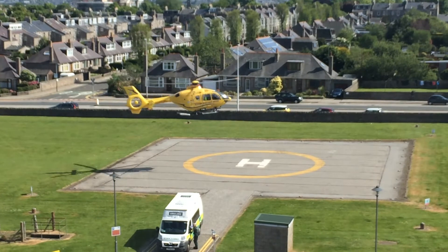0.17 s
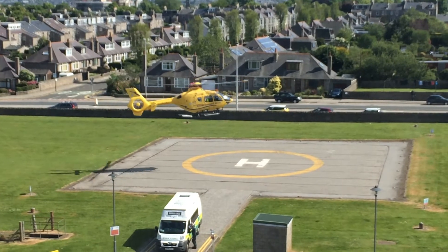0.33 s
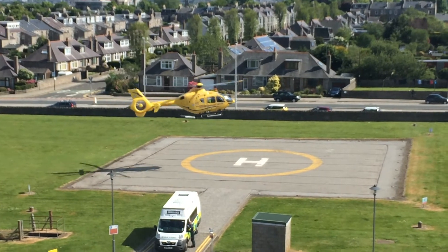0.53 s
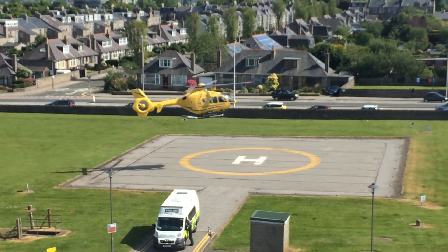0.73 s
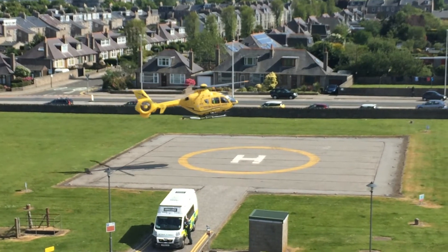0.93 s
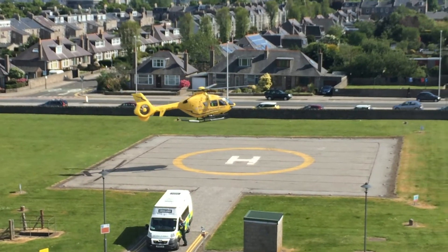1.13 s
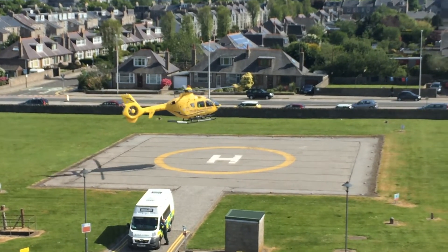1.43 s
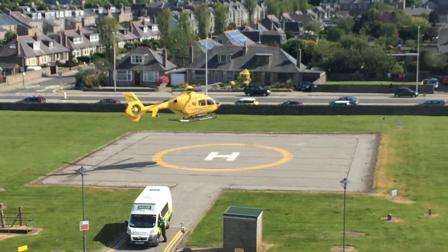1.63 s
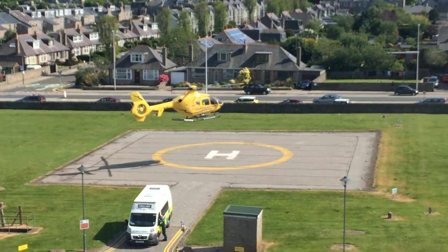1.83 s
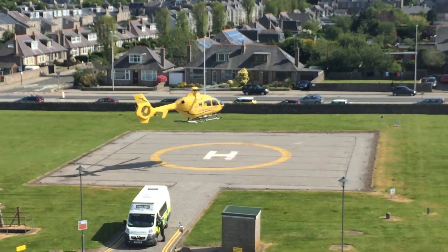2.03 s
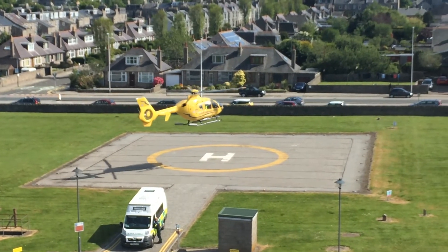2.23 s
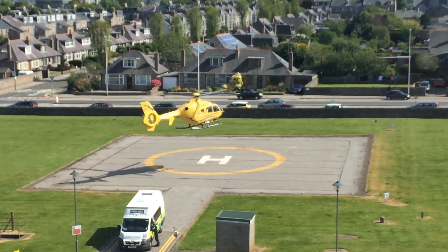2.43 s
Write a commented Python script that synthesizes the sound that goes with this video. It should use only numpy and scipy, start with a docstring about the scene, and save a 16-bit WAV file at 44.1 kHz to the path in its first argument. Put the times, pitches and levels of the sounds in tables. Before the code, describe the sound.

Steady low drone of a distant hovering helicopter, with swishing blades and a fuzzy whine.

```python
"""Over open grass and houses, a light helicopter hovers some way off.
Its main rotor drones on harmonics of the blade-passing rate; three stand out and fade in turn.
Each blade sheds a swish of turbulent air, and the fuzzy whines of the shrouded tail fan pulse in the
rotor's wake. The turbines hiss, with faint tones and, near the end, two thin whistles.
Beneath it all lie the low rumble of the downwash and a faint steady hiss."""
import sys
import numpy as np
from scipy import signal
from scipy.fft import rfft, irfft, next_fast_len
from scipy.io import wavfile
from scipy.ndimage import uniform_filter1d

SR = 44100
rng = np.random.default_rng(int(sys.argv[2]) if len(sys.argv) > 2 else 0)


def transcribe(signal):
    """Save signal, clipped to [-1, 1], as a 16-bit WAV file at the path in sys.argv[1]."""
    frames = np.atleast_2d(signal).T
    limited = np.clip(frames, -1, 1)
    pcm = np.round(limited * 32767).astype(np.int16)
    wavfile.write(sys.argv[1], SR, pcm)


N = 113778
T = np.arange(N) / SR

# The loud drone near harmonic 7. Each row: time in seconds, pitch in Hz, relative level in dB.
DRONE_TRACK = [(0.0, 192, -31.5), (0.03, 190.4, -28.5), (0.07, 189.8, -29), (0.16, 191.3, -42.5),
               (0.19, 187.8, -40), (0.22, 190, -33.5), (0.37, 191, -29.5), (0.48, 194.1, -33.5),
               (0.57, 191.7, -35.5), (0.61, 193, -27.5), (0.75, 192.8, -31), (0.84, 188.7, -30.5),
               (0.9, 188.9, -41.5), (0.95, 189.1, -34), (1.06, 190.4, -37.5), (1.11, 191, -49),
               (1.14, 190, -40.5), (1.21, 190.5, -35), (1.29, 192.1, -37.5), (1.34, 191.9, -33),
               (1.74, 192.1, -32.5), (1.81, 192.0, -39.5), (1.87, 191, -33.5), (2.03, 192.0, -42),
               (2.08, 191.7, -35), (2.12, 191.8, -36), (2.16, 190.5, -42.5), (2.28, 191.5, -36),
               (2.34, 192.4, -40), (2.38, 193.9, -55), (2.42, 193.1, -40.5), (2.5, 193.1, -45),
               (2.58, 190, -47.5)]
# The throb (harmonic 2) and the hum (harmonic 10). Each row: time in seconds, relative level in dB.
THROB_LEVEL = [(0.0, -55), (0.1, -53.5), (0.3, -56.5), (0.42, -60.5), (0.6, -55), (0.84, -46.5),
               (0.95, -52), (1.2, -53.5), (1.3, -49.5), (1.4, -56.5), (1.7, -49), (2.08, -50), (2.33, -47),
               (2.45, -48.5), (2.58, -47.5)]
HUM_LEVEL = [(0.0, -51.5), (0.08, -48.5), (0.2, -42.5), (0.4, -46.5), (0.52, -56), (0.7, -61), (0.95, -55),
             (1.08, -46.5), (1.25, -48.5), (1.5, -42), (1.78, -47), (1.92, -58), (2.05, -61), (2.22, -54.5),
             (2.4, -75), (2.58, -63)]
# The weaker harmonics in three groups. Each row: harmonic number, level in dB relative to its group.
LOW_HARMONICS = [(3, -13.5), (4, -12.5), (5, -6.5), (6, -7.5), (8, -7)]
CHOP_HARMONICS = [(9, -15), (11, -5), (12, -7), (13, -7), (14, -8.5), (15, -13), (16, -16), (17, -19.5)]
BUZZ_HARMONICS = [(18, -3.5), (19, -7.5), (20, -4.5), (21, -16.5), (22, -20.5), (23, -21), (27, -16.5)]
# The groups' levels; the downwash shares the low one. Each row: time in seconds, relative level in dB.
LOW_LEVEL = [(0.0, -46.5), (0.35, -46), (0.55, -44.5), (0.75, -47), (1.0, -47.5), (1.3, -49), (1.55, -46),
             (1.85, -49), (2.15, -48.5), (2.35, -50), (2.58, -49.5)]
CHOP_LEVEL = [(0.0, -51), (0.2, -50.0), (0.45, -51.5), (0.62, -48.5), (0.78, -53.5), (0.95, -49.5),
              (1.15, -49), (1.33, -44.5), (1.55, -50), (1.75, -54.5), (2.0, -60.5), (2.3, -58),
              (2.58, -56.5)]
BUZZ_LEVEL = [(0.0, -52), (0.2, -59), (0.45, -53.5), (0.65, -52.5), (0.8, -54), (1.0, -53.5), (1.17, -49.5),
              (1.3, -56.5), (1.5, -49), (1.75, -63.5), (2.1, -66), (2.4, -67), (2.58, -57.5)]


def main_rotor(passes):
    """Periodic excitation: regular blade passes radiate a harmonic series, led by three partials."""
    drone_cycles = np.cumsum(curve(DRONE_TRACK)) / SR
    drone = amp(curve(DRONE_TRACK, column=2) - 0.5) * np.cos(2 * np.pi * drone_cycles)
    throb = amp(curve(THROB_LEVEL)) * np.cos(2 * np.pi * 2 * passes)
    hum = amp(curve(HUM_LEVEL) + 1) * np.cos(2 * np.pi * 10 * passes)
    low = fading_harmonics(passes, LOW_HARMONICS, LOW_LEVEL)
    chop = fading_harmonics(passes, CHOP_HARMONICS, CHOP_LEVEL)
    buzz = fading_harmonics(passes, BUZZ_HARMONICS, BUZZ_LEVEL)
    return np.sqrt(2) * (drone + throb + hum + low + chop + buzz)


def fading_harmonics(passes, harmonics, level, depth=0.49, fading_hz=9):
    """Scintillation: turbulent air stirs the amplitude and phase of each harmonic separately."""
    group = np.zeros(N)
    for number, db in harmonics:
        air = unit(1 + depth * (drift(fading_hz) + 1j * drift(fading_hz)))
        cycles = number * passes + 0.25 * rng.standard_normal()  # scattered starting phase
        group += amp(db) * (air * np.exp(2j * np.pi * cycles)).real
    return amp(curve(level)) * group


# The colour of the swish. Each row: frequency in Hz, relative spectral density in dB.
SWISH_SPECTRUM = [(150, -10.5), (280, -2), (400, -0.5), (530, 1.5), (620, -2), (710, -8.5), (810, -0.5),
                  (890, -0.5), (960, -1), (1030, -14), (1200, -7), (1400, -10.5), (2500, -11),
                  (6000, -41.5)]
# Its loudness. Each row: time in seconds, relative level in dB.
SWISH_ENVELOPE = [(0.0, -58), (0.25, -60), (0.6, -61), (0.9, -60), (1.1, -59), (1.35, -54), (1.55, -54),
                  (1.8, -58.5), (2.1, -58.0), (2.58, -61.5)]


def blade_swish(passes):
    """Turbulence noise: each blade sheds a puff of eddying air."""
    gain = amp(curve(SWISH_ENVELOPE) + 1) * blade_pulse(passes, depth=0.22)
    return gain * noise(SWISH_SPECTRUM, patch_db=1.5)


def blade_pulse(passes, depth):
    """Amplitude modulation: a gain that swells briefly at each blade pass."""
    return unit(1 + depth * sum(np.cos(2 * np.pi * k * passes) / k for k in (1, 2, 3)))


# The three fan whines. Each row: frequency in Hz, width in Hz, level offset in dB.
FAN_WHINES = [(954, 27, -1), (1133, 26, 0), (2029, 105, -0.5)]
# Their loudness. Each row: time in seconds, relative levels of the low, middle and high whine in dB.
FAN_LEVELS = [(0.0, -61, -61.5, -68), (0.2, -75, -64, -70.5), (0.48, -66.5, -65.0, -60.5),
              (0.65, -62.5, -62.5, -68), (0.85, -67.5, -68.5, -61.5), (1.02, -63, -57.5, -65),
              (1.2, -63.5, -64, -61), (1.4, -56.5, -62.5, -61.5), (1.58, -62, -59, -62.5),
              (1.7, -62.5, -66.5, -57.5), (1.85, -65.5, -74.5, -63), (2.05, -65.5, -73.5, -61.5),
              (2.28, -65, -65.5, -60.5), (2.45, -75, -63, -67), (2.58, -71, -61, -65)]


def tail_fan(passes):
    """Wake modulation: the fan's narrow-band whines pulse at the main rotor's blade rate."""
    whines = sum(amp(db + curve(FAN_LEVELS, column)) * narrow_band(hz, width_hz)
                 for column, (hz, width_hz, db) in enumerate(FAN_WHINES, start=1))
    return blade_pulse(passes, depth=0.18) * whines


# The exhaust hiss and its treble. Each row: frequency in Hz, relative spectral density in dB.
HISS_SPECTRUM = [(100, -3), (500, -0.5), (850, 2.5), (1040, -6), (1250, -2.5), (1600, 1.5), (1880, -0.5),
                 (2030, 1), (2220, 1), (2300, -2.5), (2380, 2), (2480, -7), (2830, -4), (2960, -8.5),
                 (3500, -13), (4200, -20.5), (5200, -34), (8000, -50.5)]
TREBLE_SPECTRUM = [(2000, -20), (3800, 1), (4700, -0.5), (5900, -4), (7000, -9.5), (10000, -15.5),
                   (15000, -20)]
# Their loudness. Each row: time in seconds, relative level in dB.
HISS_ENVELOPE = [(0.03, -59), (0.25, -62), (0.5, -59.5), (0.75, -61), (0.95, -62), (1.2, -58.5),
                 (1.45, -66), (1.7, -63.0), (2.05, -63), (2.28, -60.5), (2.45, -64.5), (2.58, -64)]
TREBLE_ENVELOPE = [(0.05, -75), (0.5, -76.5), (0.85, -77), (1.15, -76.5), (1.43, -76.5), (1.65, -80),
                   (2.1, -79.5), (2.3, -76.5), (2.58, -79.5)]


def turbine_exhaust():
    """High-frequency absorption: the exhaust's broadband hiss, fluttering slightly, is dull from afar."""
    flutter_db = drift(rate_hz=30)
    hiss = amp(curve(HISS_ENVELOPE) + 5 + flutter_db) * noise(HISS_SPECTRUM, patch_db=2.5)
    treble = amp(curve(TREBLE_ENVELOPE) + 0.5) * noise(TREBLE_SPECTRUM, patch_db=1)
    return hiss + treble


# Steady tones, and whistles at their loudest. Each row: frequency in Hz, width in Hz, level in dB.
TURBINE_TONES = [(755, 3.9, -72.5), (804, 16, -67), (2385, 66, -73.5), (3480, 140, -79.5)]
TURBINE_WHISTLES = [(4706, 90, -85), (9600, 220, -88)]


def turbine_tones(whistle_at_s=2.48, spread_s=0.078):
    """Narrow-band radiation: faint engine tones persist, and thin whistles come through briefly."""
    tones = sum(amp(db) * narrow_band(hz, width_hz) for hz, width_hz, db in TURBINE_TONES)
    whistles = sum(amp(db) * narrow_band(hz, width_hz) for hz, width_hz, db in TURBINE_WHISTLES)
    swell = np.exp(-((T - whistle_at_s) / spread_s) ** 2)
    return tones + swell * whistles


# The colour of the downwash. Each row: frequency in Hz, relative spectral density in dB.
DOWNWASH_SPECTRUM = [(15, -28.5), (30, -20), (52, -8.5), (75, -6.5), (100, -15), (135, 1), (190, -1),
                     (230, 4), (300, -16), (420, -23.5), (800, -58.5)]


def downwash():
    """Flow noise: the air driven down by the rotor rumbles at low frequencies."""
    return amp(curve(LOW_LEVEL) + 0.5) * noise(DOWNWASH_SPECTRUM, patch_db=1)


# The colour of the background. Each row: frequency in Hz, relative spectral density in dB.
BACKGROUND_SPECTRUM = [(4000, -1.5), (7000, -1), (10000, -7), (15000, -5)]


def background_hiss(level_db=-84):
    """Noise floor: a faint steady hiss lies under everything."""
    return amp(level_db) * noise(BACKGROUND_SPECTRUM, patch_db=2)


def noise(spectrum, patch_db):
    """Spectral shaping: coloured noise of unit rms, with drifting patches from the moving air."""
    hz = np.fft.rfftfreq(2048, 1 / SR)
    knot_hz, knot_db = np.transpose(spectrum)
    colour_db = np.interp(np.log(hz + 1), np.log(knot_hz), knot_db)
    real, imag, patches = rng.standard_normal((3, len(hz), N // 512 + 5))
    patches = uniform_filter1d(patches, size=8, axis=0)  # smooth across frequency
    patches = unit(uniform_filter1d(patches, size=12, axis=1))  # and across time
    frames = (real + 1j * imag) * amp(colour_db[:, None] + patch_db * patches)
    return unit(signal.istft(frames, nperseg=2048, noverlap=1536)[1][:N])


def narrow_band(hz, width_hz):
    """Resonance: white noise through one steep peak becomes a fuzzy tone."""
    size = next_fast_len(N)
    detuning = (np.fft.rfftfreq(size, 1 / SR) - hz) / (0.8 * width_hz)
    white = rfft(rng.standard_normal(size))
    return unit(irfft(white / (1 + detuning ** 2), size)[:N])


def drift(rate_hz):
    """Superposition: sines of random phase, up to the given rate, sum to smooth motion of unit size."""
    times = np.linspace(0, T[-1], num=600)
    hz = rate_hz * np.geomspace(0.1, 1, num=16)[:, None]
    sines = np.sin(2 * np.pi * (hz * times + rng.random(hz.shape)))
    return np.interp(T, times, unit(sines.sum(0)))


def curve(points, column=1):
    """Linear interpolation: one column of a time table at every sample."""
    rows = np.array(points)
    return np.interp(T, rows[:, 0], rows[:, column])


def amp(db):
    """The decibel scale: a level becomes an amplitude gain."""
    return 10 ** (np.asarray(db) / 20)


def unit(x):
    """Normalisation to an rms of one."""
    return x / np.sqrt(np.mean(abs(x) ** 2) + 1e-20)


def scene(blade_hz=27.49, wobble=0.003):
    """Superposition: all sources add in one channel, with rotor, swish and fan sharing one blade rate."""
    blade_rate = blade_hz * (1 + wobble * drift(rate_hz=5))
    passes = np.cumsum(blade_rate) / SR  # running count of blade passes
    background = background_hiss()
    rotor = main_rotor(passes) + downwash() + blade_swish(passes)
    return (rotor + tail_fan(passes) + turbine_exhaust() + turbine_tones() + background)[None]


def record(dry, cutoff_hz=15300):
    """Band limiting: a steep low-pass filter removes the highest treble."""
    lowpass = signal.firwin(511, cutoff_hz, window=("kaiser", 9), fs=SR)
    return signal.oaconvolve(dry, lowpass[None], "same")


dry = scene()
out = record(dry)
transcribe(out)
```